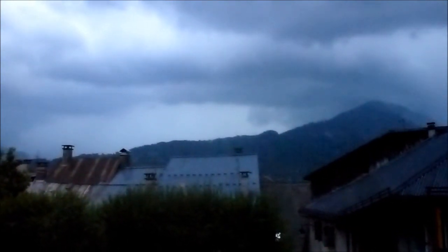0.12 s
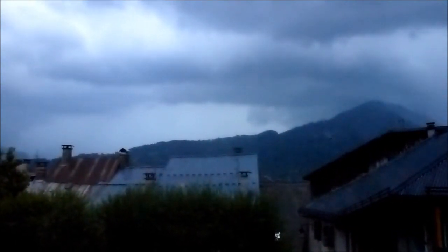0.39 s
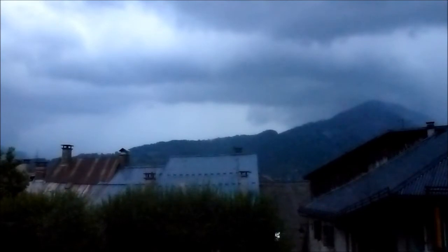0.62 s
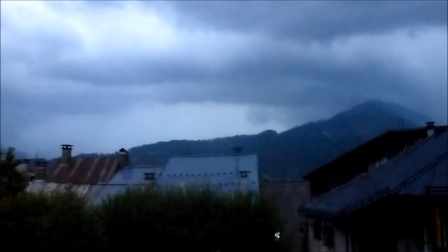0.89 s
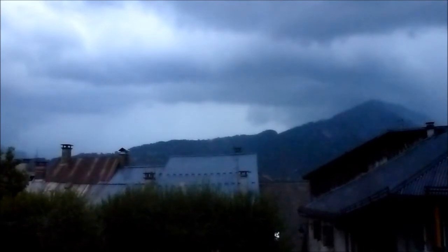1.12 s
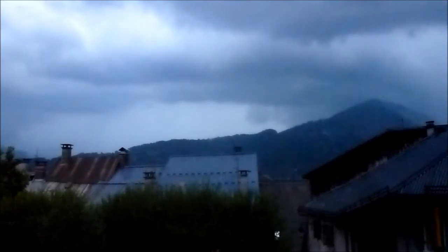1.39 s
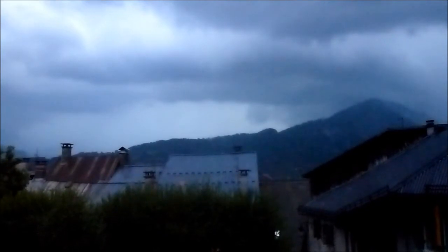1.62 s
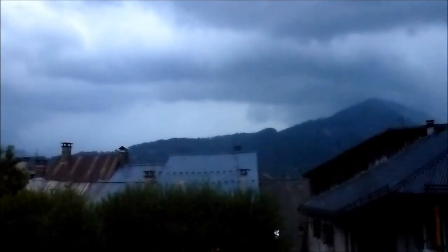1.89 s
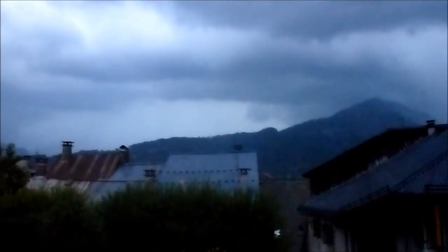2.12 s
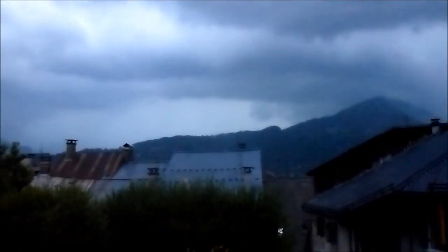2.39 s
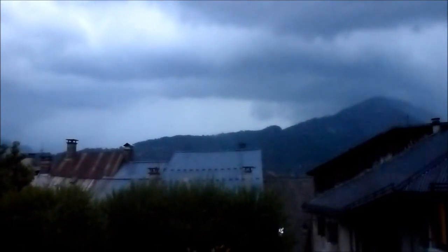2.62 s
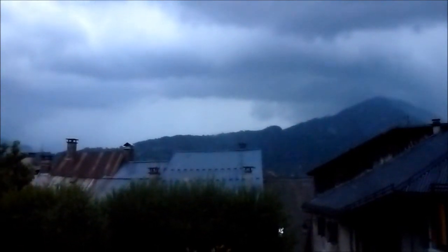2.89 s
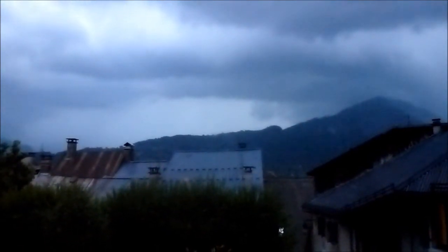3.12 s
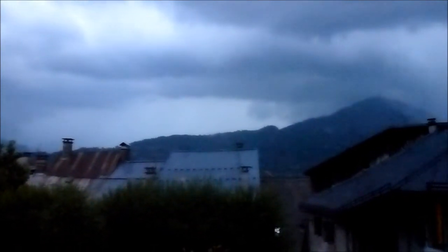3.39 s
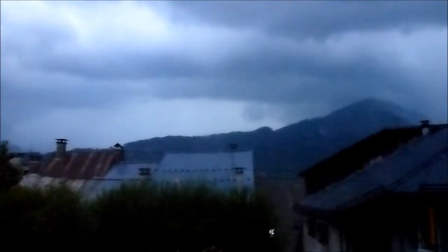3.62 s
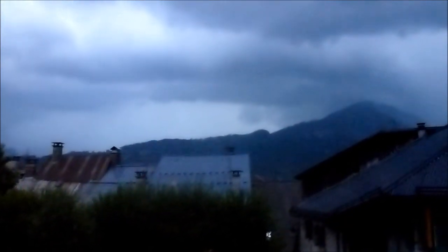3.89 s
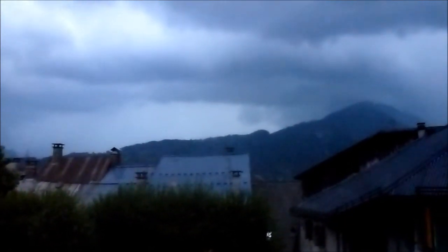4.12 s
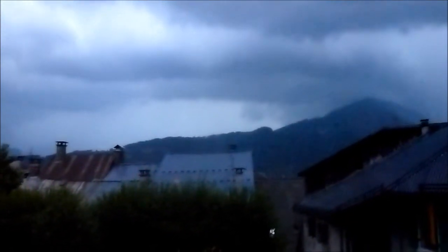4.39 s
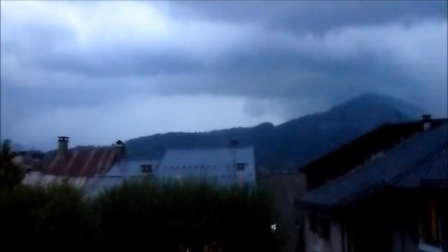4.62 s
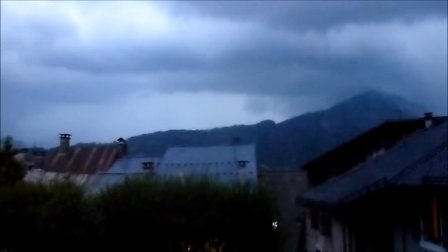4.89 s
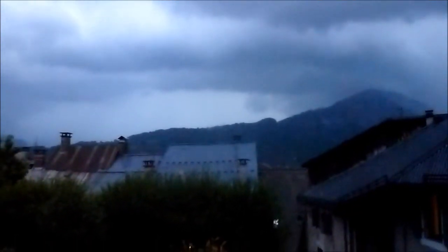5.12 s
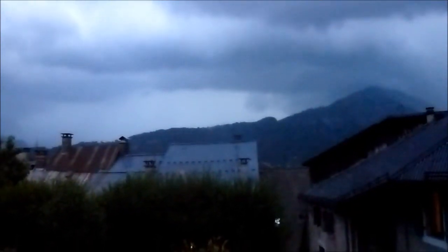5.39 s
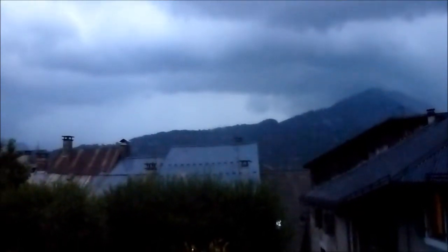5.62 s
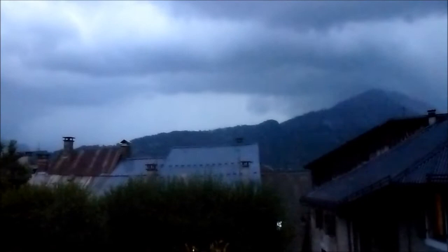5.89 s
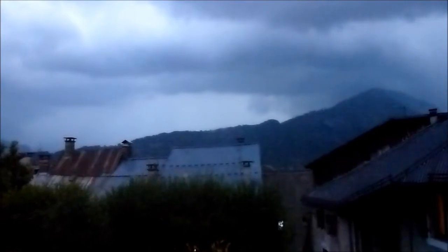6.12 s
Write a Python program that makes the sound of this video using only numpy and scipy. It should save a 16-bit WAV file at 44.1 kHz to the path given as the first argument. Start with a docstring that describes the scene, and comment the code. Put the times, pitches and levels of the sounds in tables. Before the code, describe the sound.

A continuous fluttering rain hiss spreads left and right, with light ticks of nearby drops. Distant thunder arrives in uneven clusters: a first group of round, low knocks, a quieter rumbling lull, then a second rolling group with deeper blows and faint low crackle. It eases into rumble as the rain continues. Open valley village, small camera at a window, thunder centred, no sharp bright crack.

```python
"""Thunder rolls twice across a valley while steady rain falls on village roofs, heard by a small camera at a window.
Shock waves from the crooked lightning channel arrive scattered in time, dulled by distance, and ring the recess
near 260 Hz: random clicks with echoes are filtered into deep, middle and short shocks, with single strong booms on top.
The rain is filtered noise with flickering bands, small splashes, near drops and one rising bubble; its hiss dips
for moments, mostly near strong booms of the second roll."""
import sys
import numpy as np
from scipy import signal
from scipy.fft import rfft, irfft, next_fast_len
from scipy.io import wavfile
from scipy.ndimage import uniform_filter1d

SR = 44100
rng = np.random.default_rng(int(sys.argv[2]) if len(sys.argv) > 2 else 0)


def wrap_up_sound(samples):
    """Save the sound to the file named by the first command line argument, as 16-bit audio."""
    columns = np.atleast_2d(samples).T
    # keep every value between -1 and 1, then stretch to whole-number steps
    tamed = np.clip(columns, -1, 1)
    steps = np.round(tamed * 32767).astype(np.int16)
    wavfile.write(sys.argv[1], SR, steps)


def gain_from_db(level_db):
    """Convert decibel levels to linear amplitude factors (20 dB per decade)."""
    decades = np.asarray(level_db, float) / 20
    return 10 ** decades


N = 275723  # length of the scene in samples
LEFT_RIGHT = np.array([[1], [-1]])  # adds a sound to the left and takes it from the right


def level(x, db):
    """Scale a sound to an rms level."""
    return x * gain_from_db(db) / np.sqrt(np.mean(x ** 2))


def pan(db):
    """Gains of left and right that lie db apart, positive when the left is louder."""
    return gain_from_db(LEFT_RIGHT * 0.5 * db)


def colour(x, points):
    """Filter a sound by (pitch_hz, level_db) points joined on a log frequency axis."""
    size = next_fast_len(x.shape[-1])
    hz, db = np.transpose(points)
    freq = np.maximum(np.arange(size // 2 + 1) * SR / size, 1)
    gain = gain_from_db(np.interp(np.log(freq), np.log(hz), db))
    return irfft(rfft(x, size) * gain, size)[..., :x.shape[-1]]


def curves(table):
    """Join the rows of a table into one curve of straight lines per column, with a value for every sample."""
    time_s, *columns = np.transpose(table)
    return [np.interp(np.arange(N) / SR, time_s, column) for column in columns]


def walk(rate):
    """Random wandering: rate new values a second, smoothed twice, with a spread near 1."""
    hold = int(SR / rate)
    steps = np.repeat(rng.standard_normal(N // hold + 1), hold)
    return 1.3 * uniform_filter1d(uniform_filter1d(steps, hold), hold)[:N]


def scatter(rate, spread_db):
    """Random clicks of either sign, about rate a second, some larger than the rest."""
    chance = rng.random((3, N))
    size_db = spread_db * np.minimum(-np.log(1 - chance[2]), 3)
    happens = chance[0] < rate / SR
    return happens * np.sign(chance[1] - 0.5) * gain_from_db(size_db)


def smear(clicks, tail_s):
    """Ever-changing noise that dies away after each click."""
    keep = np.exp(-1 / (tail_s * SR))
    power = signal.lfilter([1], [1, -keep], clicks ** 2)
    return np.sqrt(power) * rng.standard_normal(N)


def patter(points, shared_flicker):
    """Far rain: noise with small splashes, split into bands that flicker together and alone."""
    splashes = level(smear(scatter(300, 4.4), 0.0026), -6)
    source = colour(rng.standard_normal(N) + splashes, points)
    edges_hz = [10, 700, 1400, 2800, 5000, 9000]
    out = 0
    for low, high in zip(edges_hz, edges_hz[1:]):
        band_filter = signal.butter(2, [low, high], "band", fs=SR, output="sos")
        band = signal.sosfiltfilt(band_filter, source)
        out = out + band * gain_from_db(0.62 * shared_flicker + 0.62 * walk(12))
    return out


def dips():
    """Gain of the hiss: down almost at once, held, then an exponential return."""
    # short drops of the hiss: start_s, depth_db, held_s, return_s (time constant)
    drop_table = [(4.462, 7, .1, .14), (4.826, 7, .065, .022), (5.29, 3.5, .11, .08),
                  (5.885, 3.5, .04, .02)]
    t, down_db = np.arange(N) / SR, 0
    for start, depth_db, held, back in drop_table:
        fade = np.exp(-np.maximum(t - start - held, 0) / back)
        down_db = down_db + depth_db * (t > start) * fade
    return gain_from_db(-uniform_filter1d(down_db, size=200))


def hiss():
    """Hiss of the far rain, scaled so that its treble follows a level curve; left and right are unlike."""
    # treble level of the part common to both sides, before the dips: time_s, level_db
    treble_level = [(0, -52), (.5, -53.5), (1.3, -53.5), (1.75, -51.5), (1.95, -54.5), (2.4, -52),
                    (2.95, -54), (3.75, -53), (4.35, -53.5), (4.5, -56), (5.5, -57), (6., -54), (6.25, -55)]
    # colour of the rain common to both sides: pitch_hz, level_db (per Hz, relative)
    common_colour = [(20, -23.5), (32, -18.5), (60, -4), (100, 2), (255, -3.5), (500, 1), (800, -2),
                     (1130, -2.5), (1400, -7.5), (2200, -9.5), (3000, -11.5), (5000, -11), (6300, -12.5),
                     (7200, -17.5), (7800, -35)]
    # colour of the rain that differs between the sides: pitch_hz, level_db (per Hz, relative)
    difference_colour = [(25, -27.5), (70, -19), (120, -5), (300, 0.5), (500, 1.5), (1400, -5.5),
                         (3000, -7.5), (5600, -12), (6800, -16), (7800, -33.5)]
    treble = signal.butter(4, [1500, 7500], "band", fs=SR, output="sos")
    shared_flicker = walk(9)
    common = patter(common_colour, shared_flicker)
    difference = patter(difference_colour, shared_flicker)
    common = common / np.std(signal.sosfilt(treble, common))
    difference = difference / np.std(signal.sosfilt(treble, difference))
    both_sides = common + gain_from_db(-0.4) * difference * LEFT_RIGHT
    return gain_from_db(curves(treble_level)[0]) * both_sides * dips()


def drops():
    """Near drops tick on the sill: a short damped ring with an overtone, plus a broad click."""
    # near drops: start_s, level_db (scale of ring and click), ring_hz, left_minus_right_db
    drop_table = [(0.077, -45, 2230, 2.5), (1.2905, -41.5, 5760, 2.5), (1.4293, -41.5, 1890, 0),
                  (1.476, -39, 2210, 1), (1.7094, -40, 4910, -4), (2.0082, -42.5, 2430, -1.5),
                  (2.0944, -44, 1970, -4.5), (2.4567, -38.5, 5570, -7), (3.1701, -42.5, 1870, -4),
                  (3.248, -45.5, 1940, 1.5), (3.3438, -43, 4590, 0.5), (3.7217, -40.5, 5900, -3),
                  (3.7847, -33.5, 2930, -7), (3.9235, -44, 5880, 5.5), (4.9039, -47, 2300, -1)]
    size = 600  # samples in one drop
    out, t = np.zeros((2, N + size)), np.arange(size) / SR
    click_colour = [(800, -23.5), (2200, -3.5), (4000, -1.5), (6500, -1), (7500, -12), (12000, -38)]
    noises = level(colour(rng.standard_normal((len(drop_table), 2, size)), click_colour), 0)
    for (start, db, hz, pan_db), noise in zip(drop_table, noises):
        tones = 0.64 * np.sin(2 * np.pi * hz * t) + 0.5 * np.sin(2 * np.pi * 2.15 * hz * t)
        ring = tones * np.exp(-t / 0.0016)
        # part of the click is the same on both sides, part is each side's own
        click = (0.38 * noise[0] + 0.35 * noise) * np.exp(-t / 0.0018) * np.minimum(t / 0.0004, 1)
        i = int(start * SR)
        out[:, i:i + size] += gain_from_db(db) * pan(pan_db) * (ring + click)
    return out[:, :N]


def bubble():
    """A drip into a puddle traps a bubble: a short sine that glides up as it nears the surface."""
    # one bubble: start_s, peak_db, start_hz, rise_hz_per_s, length_s (loudest after half of it)
    start, peak_db, hz, rise, length = (5.834, -60, 3480, 16996, .028)
    t = np.maximum(np.arange(N) / SR - start, 0)
    swell = np.e * t / length * 2 * np.exp(-2 * t / length)
    return gain_from_db(peak_db) * swell * np.sin(2 * np.pi * (hz * t + rise * t ** 2 / 2))


def rain():
    """Far drops blend into a hiss, while near drops and a bubble stand out singly."""
    return hiss() + drops() + bubble()


def shocks(rate, spread_db, echo_db, points, even):
    """Scattered shock fronts with echoes from slopes and walls; even (0 to 1) sets how far the flow is levelled."""
    fronts = scatter(rate, spread_db)
    echoes = smear(fronts, 0.033)
    x = colour(level(fronts, 0) + level(echoes, echo_db), points)
    window = SR // 14
    power = uniform_filter1d(uniform_filter1d(x ** 2, window), window)
    return level(x / (power + 1e-18) ** (even / 2), 0)


def surges(db, depth_db):
    """Power of body and deep roll: a rising and falling rumble plus bell-shaped swells where shocks bunch up."""
    # stretches of the channel whose shocks arrive together:
    # peak_s, level_db (midway between body and deep), depth_db (deep minus body), length_s (peak to 1/e amplitude)
    swells = [(1.095, -31, -8.5, .036), (1.217, -29.5, .5, .055), (1.306, -32, -20, .05),
              (1.398, -23.5, -3.5, .07), (1.623, -27.5, -2, .042), (1.712, -29.5, -19.5, .031),
              (1.789, -27, -1.5, .023), (1.858, -26.5, -8, .024), (1.925, -32, -18, .025),
              (2.0, -30, 6, .098), (2.03, -30, -14, .03), (2.254, -34, 6.5, .033), (2.317, -40, -20, .026),
              (2.393, -30, 2.5, .077), (2.462, -30.5, -1, .023), (2.702, -33, 1, .1), (2.956, -35.5, 5, .1),
              (3.084, -43, -18, .077), (3.231, -40, 5.5, .088), (3.354, -44.5, 18.5, .06),
              (3.517, -34.5, 3.5, .11), (3.658, -35, 2.5, .05), (3.759, -35.5, 3, .047),
              (3.88, -36.5, 2.5, .053), (4.037, -33, -2, .055), (4.148, -30, -1.5, .043),
              (4.233, -29, 11.5, .034), (4.297, -34, 12, .02), (4.388, -23.5, -7.5, .088),
              (4.484, -32.5, 17.5, .053), (4.594, -32, -19, .023), (4.825, -22, .5, .024),
              (4.94, -29.5, -18.5, .045), (5.089, -34, -20, .031), (5.135, -37.5, 18.5, .026),
              (5.25, -28, -19, .035), (5.313, -24.5, 4, .049), (5.52, -31, -8, .035),
              (5.701, -40.5, 17, .05), (5.855, -33.5, 4, .031), (5.977, -35.5, 5.5, .044),
              (6.093, -38.5, -11.5, .047)]
    t = np.arange(N) / SR
    tilt = np.array([[-0.5], [0.5]])  # body, deep
    power = gain_from_db(db + tilt * depth_db) ** 2
    for peak, swell_db, swell_depth_db, length in swells:
        bell = np.exp(-2 * ((t - peak) / length) ** 2)
        power = power + gain_from_db(swell_db + tilt * swell_depth_db) ** 2 * bell
    return power


def rolling():
    """Long shocks roll deep, middle ones ring the recess, short ones crackle; returns common and unlike parts."""
    # slowly rising and falling rumble under the surges: time_s, level_db (midway between body and deep),
    # depth_db (deep minus body), short_db (crackle when body and deep together reach -24 dB)
    rumble = [(0.0, -50, 4, -46.5), (0.75, -47.5, -5, -44.5), (1.05, -43.5, -1.5, -44.5),
              (1.12, -35.5, -15, -41.5), (1.35, -47, -14.0, -33), (1.52, -31, -8, -38.5),
              (2.05, -30, -14.0, -38), (2.2, -32.5, -2.5, -36.5), (2.5, -33.5, -11, -39),
              (2.8, -42.0, -0.5, -40.5), (3.0, -34, 10, -38.5), (3.35, -47, -12.5, -43.0),
              (3.6, -38, 3.5, -41.0), (3.97, -36.5, 3, -45), (4.35, -34.0, -3, -35), (4.55, -24, 4.5, -40),
              (5.05, -29.5, 0.5, -40), (5.42, -24.0, -4.5, -36.0), (5.6, -32, -2.5, -41),
              (6.25, -39, 3.5, -42)]
    # what distance, recess and microphone leave of each size of shock: pitch_hz, level_db (per Hz, relative)
    deep_colour = [(20, -48.5), (32, -32.5), (55, -14), (88, 0.5), (130, -2), (175, -4), (230, -17),
                   (400, -77.5)]
    body_colour = [(90, -42), (150, -11), (200, -6), (240, -3.5), (264, 0.5), (290, -3), (345, -13.5),
                   (420, -30), (700, -72.5)]
    crackle_colour = [(200, -41), (330, -6), (430, -2), (575, -9), (700, -16), (900, -25), (1200, -34),
                      (2000, -57)]
    unlike_colour = [(25, -22), (90, -7), (260, 1), (600, -5), (1000, -35.5)]
    db, depth_db, short_db = curves(rumble)
    power = surges(db, depth_db)
    body_gain, deep_gain = np.sqrt(power)
    # short shocks follow the surges less steeply, a little blurred by scattering
    slope, blur_s = 0.3, 0.03
    blurred = uniform_filter1d(power.sum(axis=0), int(blur_s * SR))
    crackle_gain = gain_from_db(short_db) * (blurred / gain_from_db(-24) ** 2) ** (slope / 2)
    deep = deep_gain * shocks(250, 2.0, 1.5, deep_colour, even=0.74)
    body = body_gain * shocks(500, 2.7, 1.7, body_colour, even=0.72)
    crackle = crackle_gain * shocks(1200, 1.4, 1.8, crackle_colour, even=0.24)
    unlike = shocks(600, 2, 3, unlike_colour, even=0.4)
    return deep + body + crackle, gain_from_db(-37) * (body_gain + deep_gain) * unlike


def booms():
    """Strong arrivals: a push and a pull about a cycle long, some with a short crack unlike on the two sides."""
    # single strong shocks: centre_s, level_db (of the sine before its bell shape), pitch_hz,
    # crack_db (rms level at the height of the crack)
    arrivals = [(1.090, -26, 218, -69), (1.192, -22, 203, -54), (1.418, -11.5, 260, -46),
                (1.446, -18, 200, -46), (1.7854, -10.5, 245, -53), (1.8559, -8, 250, -50),
                (1.992, -22, 230, -37), (2.925, -28.5, 170, -52.5), (2.981, -24, 240, -38),
                (3.882, -21, 170, -58), (4.455, -15.5, 119, -38.5), (4.601, -16, 201, -51.5),
                (4.819, -11, 110, -30), (4.838, -14, 90, -60), (5.277, -15.5, 237, -61),
                (5.308, -10.5, 200, -48.5)]
    half = 2000  # samples on each side of an arrival
    out, crack, t = np.zeros(N), np.zeros(N), np.arange(-half, half) / SR
    for centre, db, hz, crack_db in arrivals:
        i = int(centre * SR) - half
        bell = np.exp(-(t * hz / 0.92) ** 2)
        out[i:i + 2 * half] -= gain_from_db(db) * np.sin(2 * np.pi * hz * t) * bell
        # the crack comes 4.6 ms ahead of the centre
        crack[i:i + 2 * half] += gain_from_db(crack_db) * np.exp(-((t + 0.0046) / 0.005) ** 2)
    crack_colour = [(150, -28.5), (350, 1), (700, 4), (1000, -6), (1400, -21), (4000, -38), (7000, -50.5)]
    noise = colour(rng.standard_normal((2, N)), crack_colour)
    return out + crack * level(noise, 0)


def thunder():
    """Many scattered shocks make the roll and the strongest make booms; almost the same on both sides."""
    common, unlike = rolling()
    return (common + booms()) * pan(0.5) + unlike * LEFT_RIGHT


def scene():
    """Thunder over rain."""
    return thunder() + rain()


def low_pass(x):
    """Removes everything above the highest recorded frequency."""
    return signal.sosfilt(signal.butter(12, 7780, fs=SR, output="sos"), x)


def record(dry):
    """The camera rounds the highest peaks, and it samples slowly, so the top is cut steeply."""
    peak_limit, top_hz = 0.42, 7750
    rounded = dry / (1 + (dry / peak_limit) ** 4) ** (1 / 4)
    top_cut = signal.ellip(10, 0.3, 60, top_hz, fs=SR, output="sos")
    finished = signal.sosfilt(top_cut, rounded)
    return low_pass(finished)


dry = scene()
out = record(dry)
wrap_up_sound(out)
```